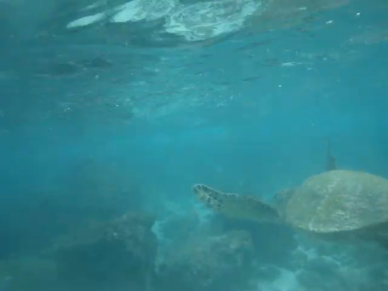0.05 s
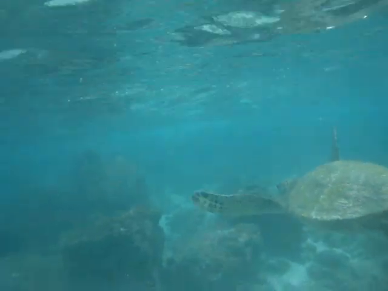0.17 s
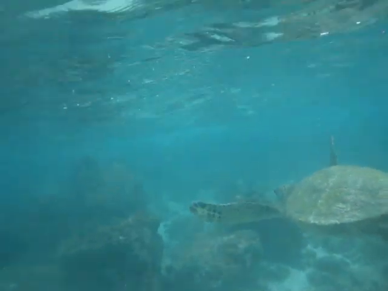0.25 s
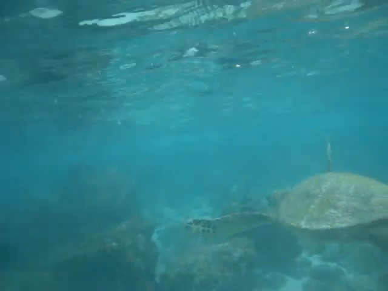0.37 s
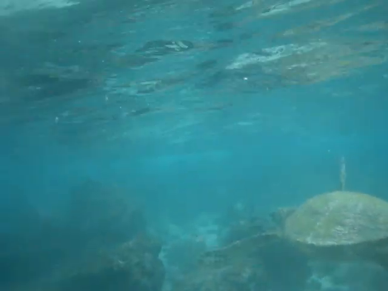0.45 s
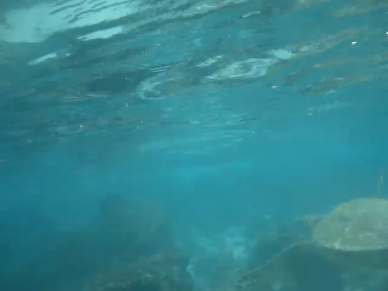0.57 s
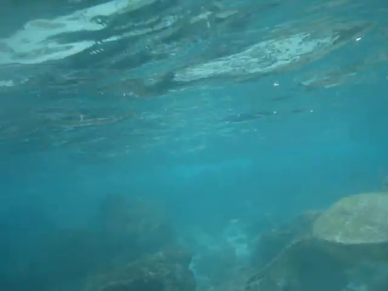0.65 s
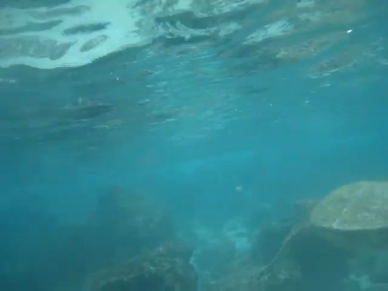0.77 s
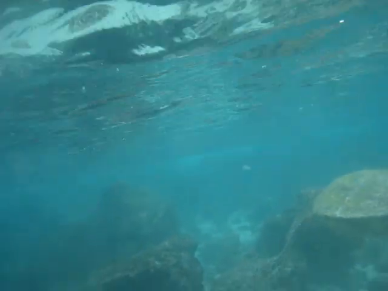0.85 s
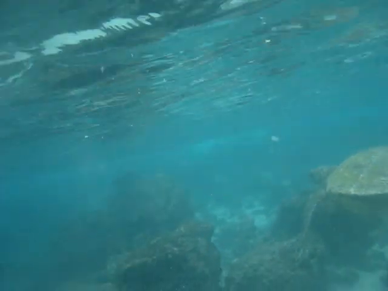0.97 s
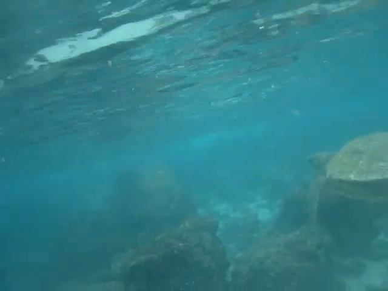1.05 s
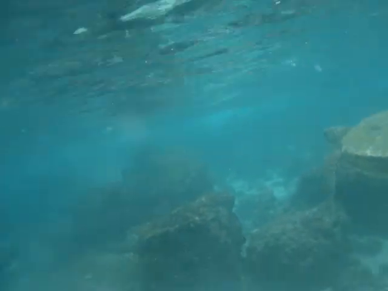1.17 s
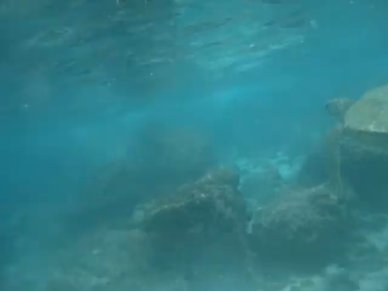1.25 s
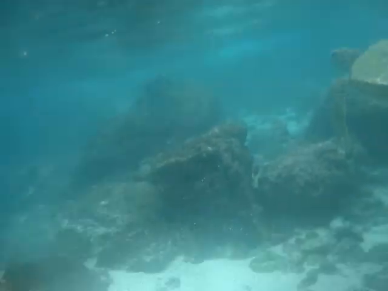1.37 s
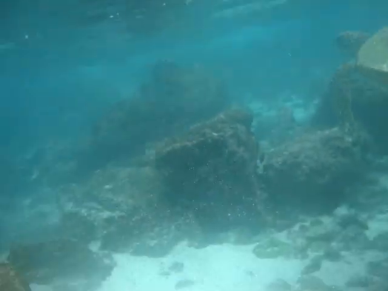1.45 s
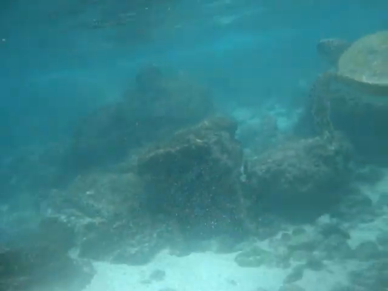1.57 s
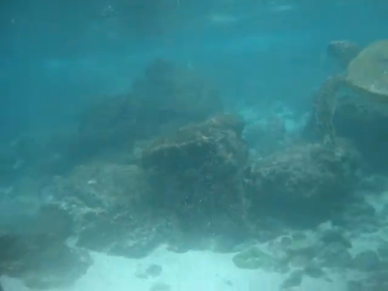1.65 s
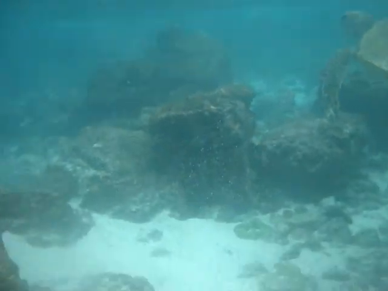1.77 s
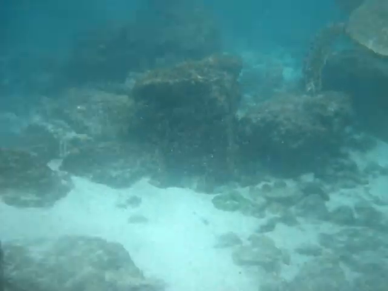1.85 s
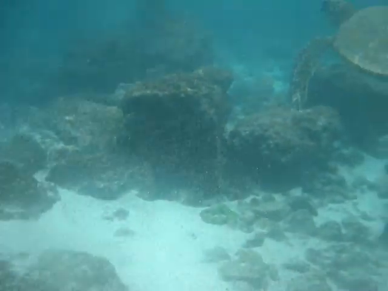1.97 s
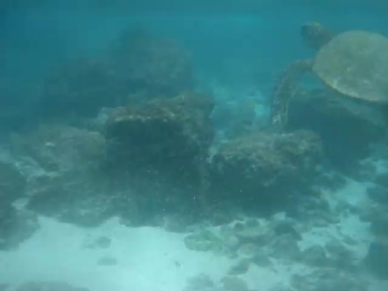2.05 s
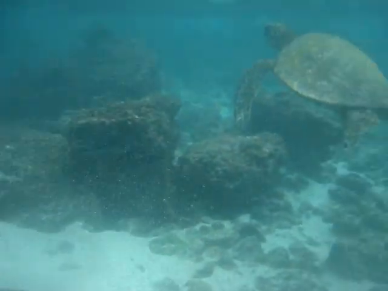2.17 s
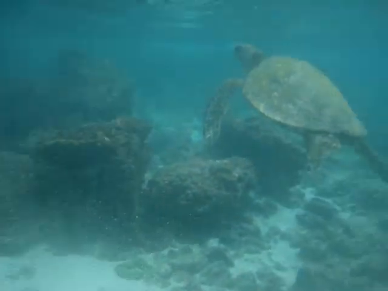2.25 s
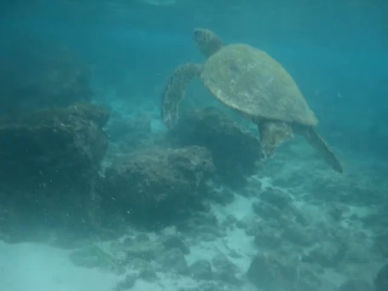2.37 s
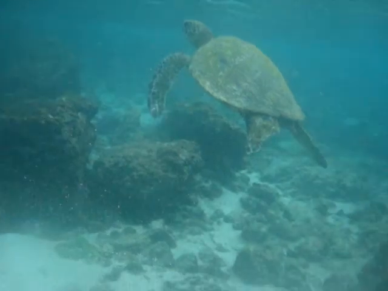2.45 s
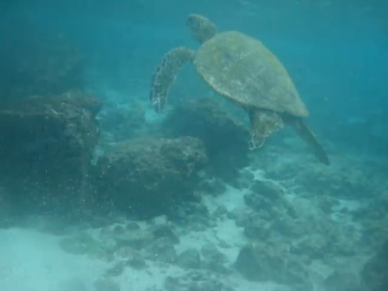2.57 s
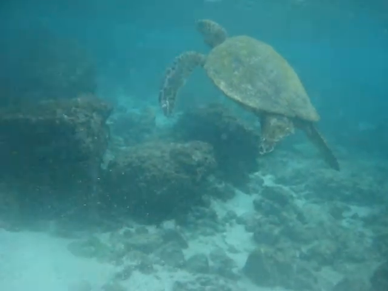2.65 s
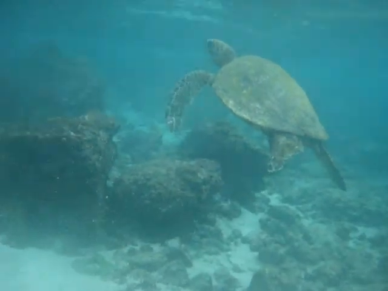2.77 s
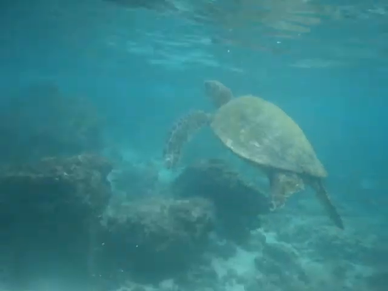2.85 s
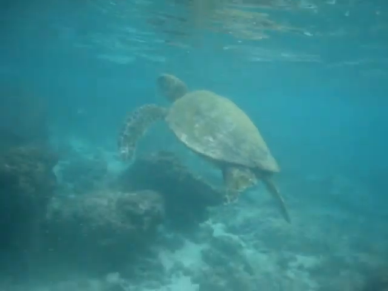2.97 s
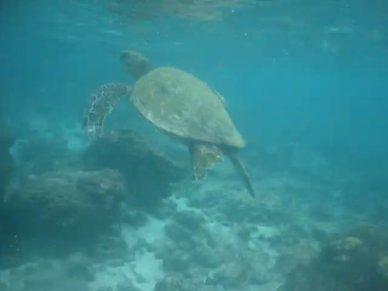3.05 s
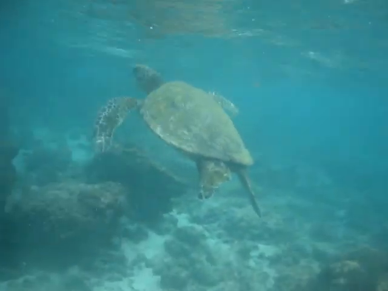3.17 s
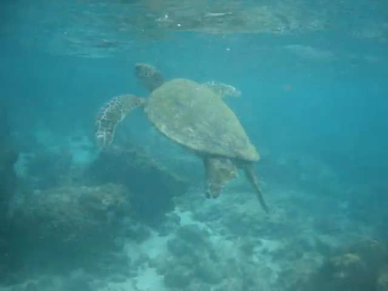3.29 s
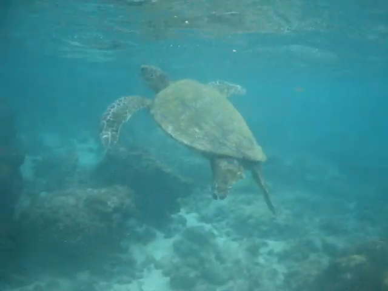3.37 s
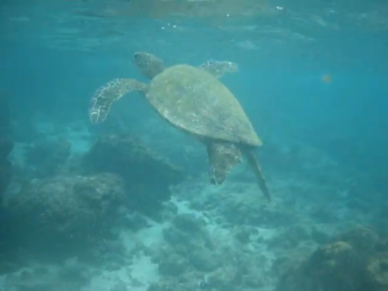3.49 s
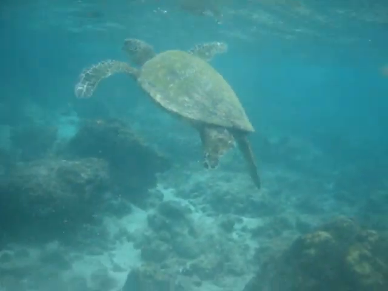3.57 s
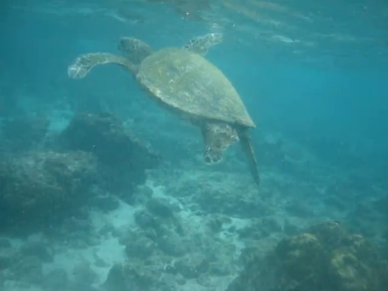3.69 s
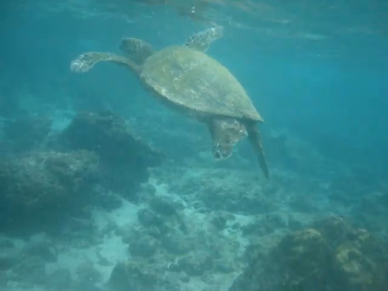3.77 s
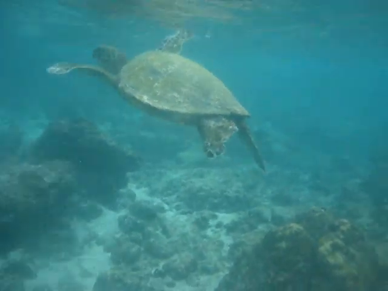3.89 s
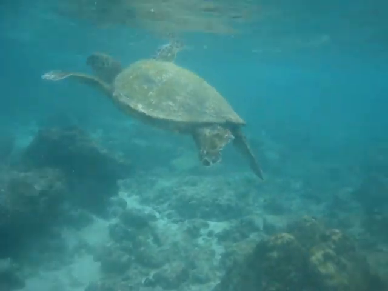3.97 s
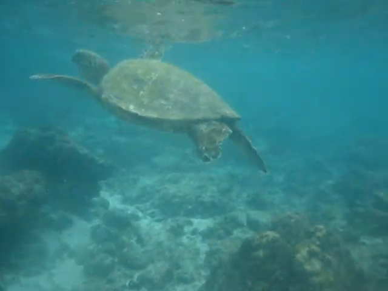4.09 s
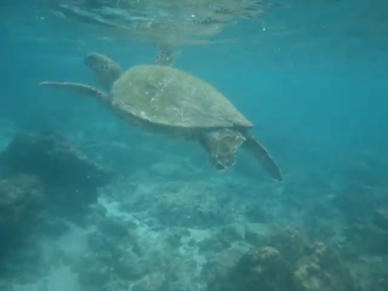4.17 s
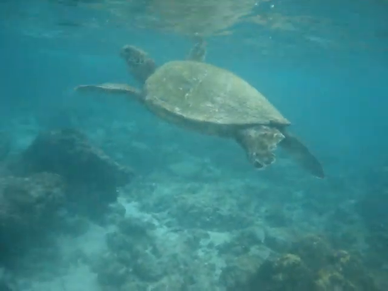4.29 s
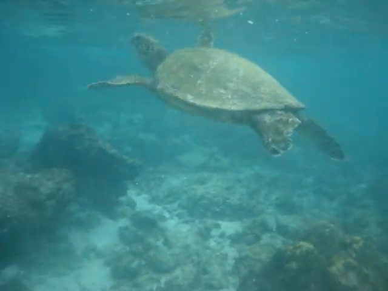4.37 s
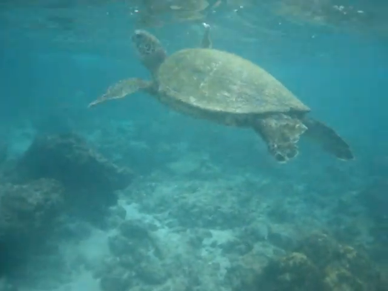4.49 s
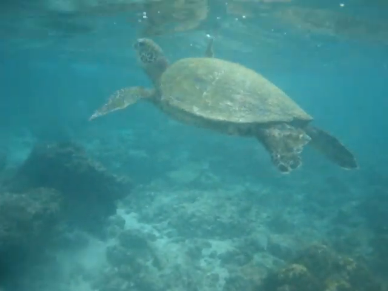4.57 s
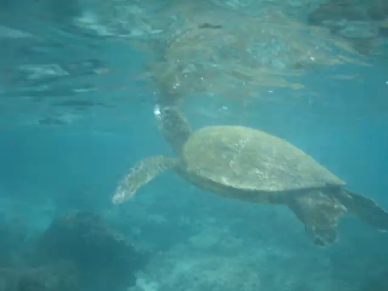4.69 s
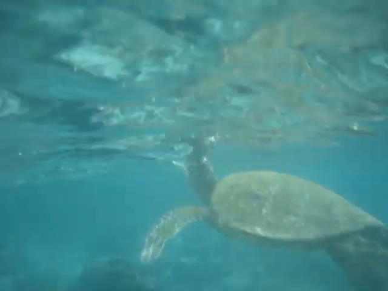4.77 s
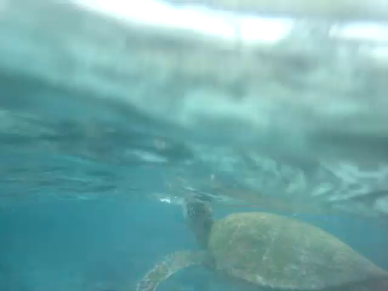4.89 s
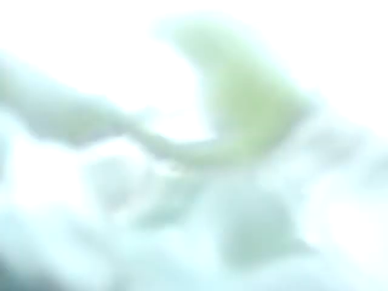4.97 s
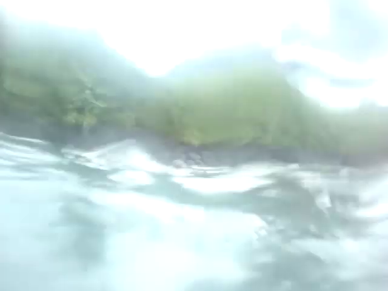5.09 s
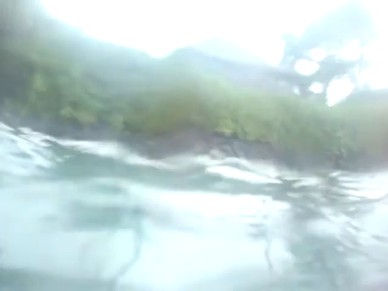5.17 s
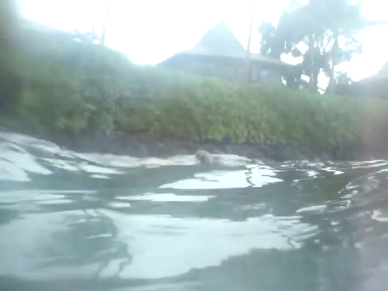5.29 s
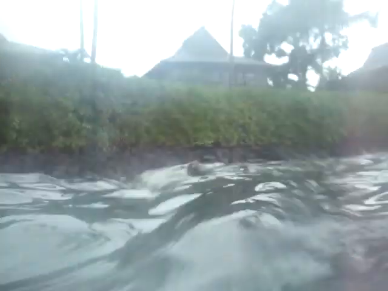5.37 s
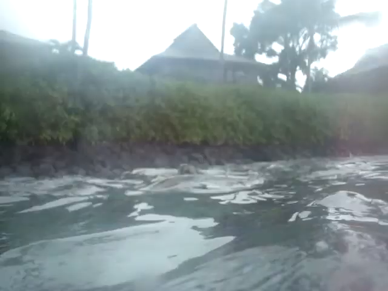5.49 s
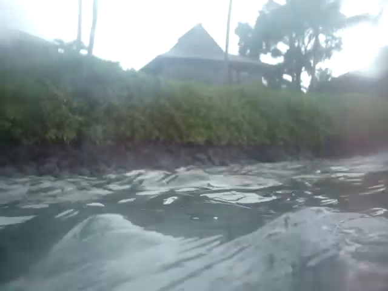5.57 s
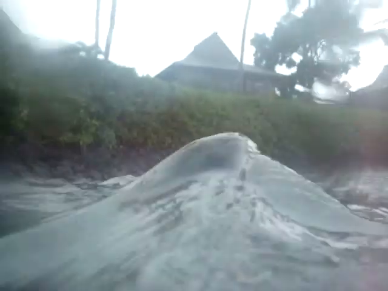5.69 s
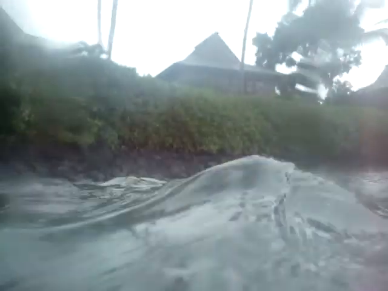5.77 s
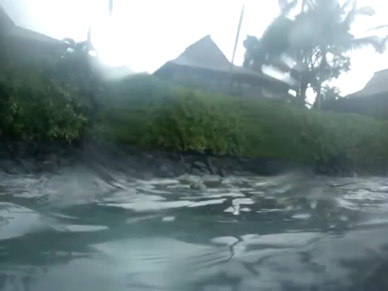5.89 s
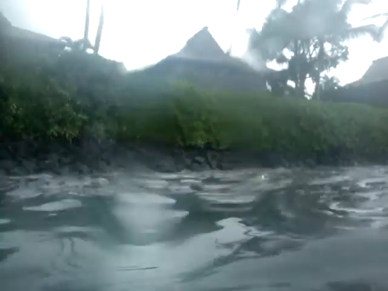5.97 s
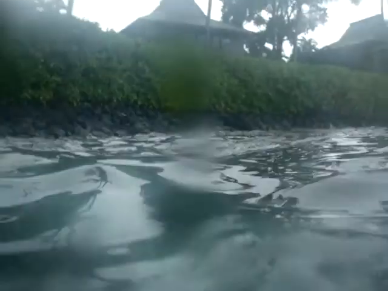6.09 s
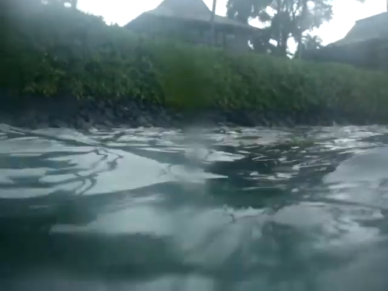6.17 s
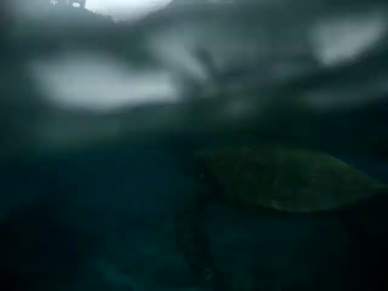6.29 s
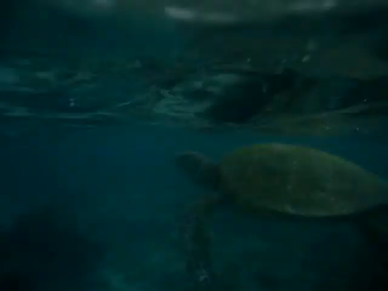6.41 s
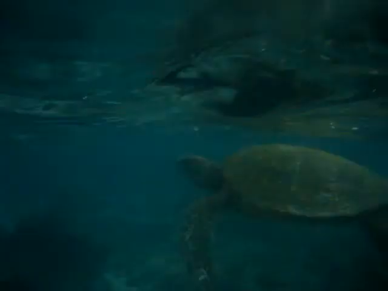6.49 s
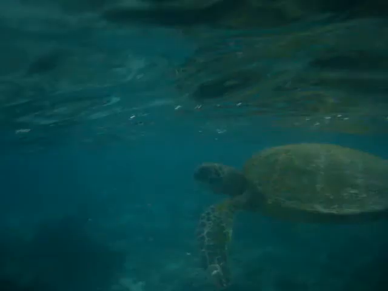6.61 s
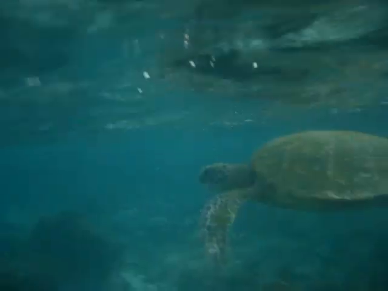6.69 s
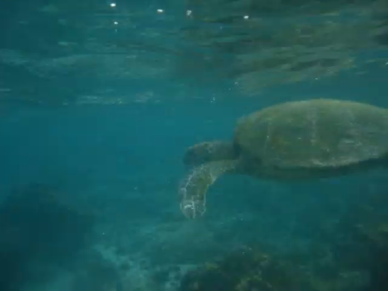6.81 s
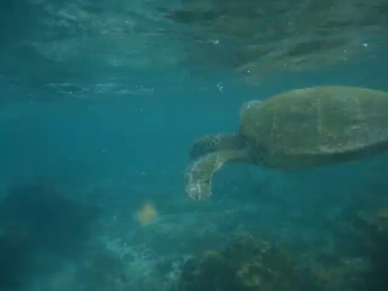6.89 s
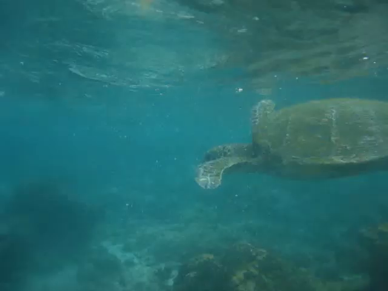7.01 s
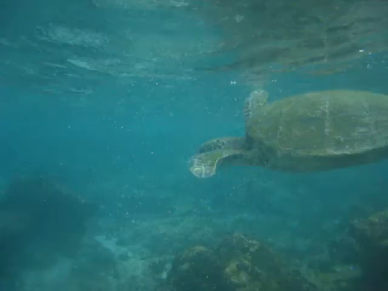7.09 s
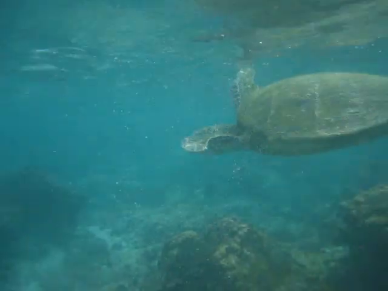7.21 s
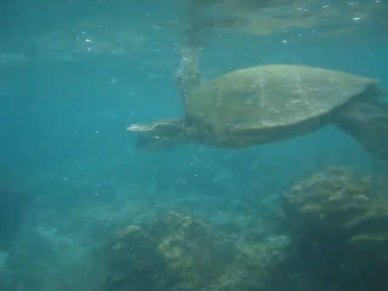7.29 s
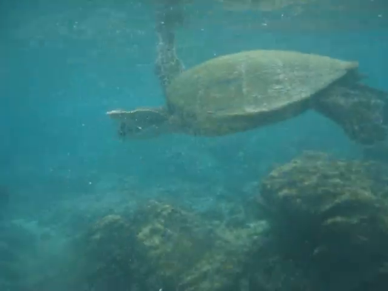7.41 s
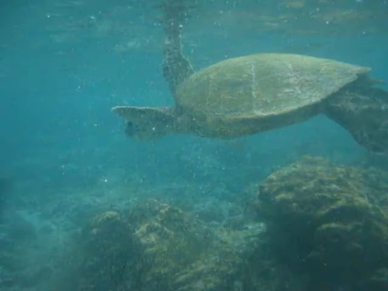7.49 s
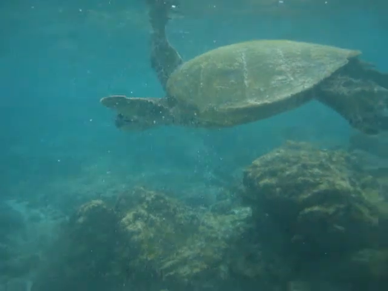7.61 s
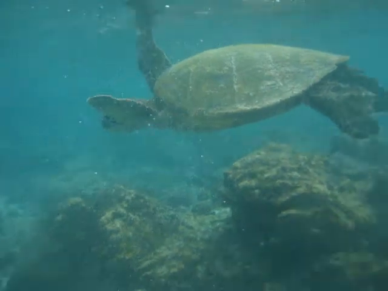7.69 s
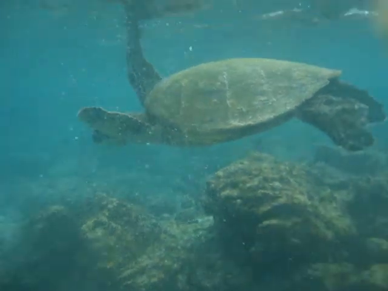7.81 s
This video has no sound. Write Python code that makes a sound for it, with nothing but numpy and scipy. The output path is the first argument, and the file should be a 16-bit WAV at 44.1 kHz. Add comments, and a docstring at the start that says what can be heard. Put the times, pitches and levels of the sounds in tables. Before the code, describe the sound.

A small camera in a sealed housing drifts in shallow sea beside a silently swimming turtle. Faint hiss and dull water rush continue throughout. A hard hollow tick comes near two seconds, followed by smaller clicks. Around five seconds it surfaces with crackling droplets, bubble plips and trickling; after a quiet gap, a much louder slap marks going under, with gurgles dying away. Very close, dry contact sound.

```python
"""A faint steady hiss and a dull rush of water run throughout: shaped noise, with fine grain and brief swishes.
A small camera in a sealed housing drifts in shallow sea; the housing ticks now and then, ringing its modes.
It comes up through the surface and dips under again: water slaps and trickles over the housing.
Splats are puffs of noise, bubbles are damped sines, the trickle is many tiny grains of both kinds,
and low thumps are short one-sided pushes of pressure."""
import sys
import numpy as np
from scipy import signal
from scipy.fft import rfft, irfft, next_fast_len
from scipy.io import wavfile
from scipy.ndimage import uniform_filter1d

SR = 44100
rng = np.random.default_rng(int(sys.argv[2]) if len(sys.argv) > 2 else 0)


def master_out(mix):
    """Clip the mix to full scale and print it as 16-bit PCM to the path in sys.argv[1]."""
    frames = np.transpose(np.atleast_2d(mix))
    ceiling = np.clip(frames, -1, 1)
    pcm = np.round(ceiling * 32767).astype(np.int16)
    wavfile.write(sys.argv[1], SR, pcm)


N = 346185

# colour of the steady hiss: pitch_hz, relative level_db
HISS_COLOUR = [(15, -51), (25, -36), (42, -25.5), (116, -7.5), (202, 0), (568, 1.5), (645, 0), (965, -10),
               (1520, -11), (1860, -13.5), (2000, -7.5), (7810, -16), (9550, -17.5), (10300, -28),
               (13400, -44), (22000, -120)]
# colour of the water stirring past the housing: pitch_hz, relative level_db
RUSH_COLOUR = [(150, -8), (400, 5.5), (1000, 6.5), (1800, 2.5), (3500, -25), (7000, -18)]
# brief swishes of water along the housing: top_s, level_db, half_length_s
WATER_SWISHES = [(1.334, -48, .035), (2.1, -60, 0.043), (2.323, -57.5, 0.026), (2.562, -55, 0.025),
                 (4.44, -66, .15)]
# ticks of the housing: start_s, level_db (ringing), sharpness_db_per_octave above the lowest mode,
# crack_level_db, crack_pitch_hz
HOUSING_TICKS = [(1.952, -5, 2, -29, 4100), (1.998, -25, 0.5, -30.5, 4740), (2.107, -25, -2, -39, 1750),
                 (2.456, -42, 14, -38, 8000), (2.573, -38, -7, -41, 1800), (2.633, -24, 8, -27, 6300),
                 (3.14, -26.5, -6, -34, 3780), (4.004, -41, 0, -33.5, 3100), (4.368, -42, -2, -50, 1500),
                 (4.482, -43, -3, -53, 1500), (5.703, -31, -3, -48, 2500), (5.94, -22.5, 3, -35, 5200),
                 (7.124, -14.5, -2.5, -21.5, 1900), (7.407, -32, -4, -28.5, 2720)]
# the tones at which the housing rings: pitch_hz, level_db, t60_s (time to fall by 60 dB)
HOUSING_MODES = [(443, -1.5, 0.015), (552, -2.5, 0.02), (1181, 8.5, 0.012), (1500, 0.5, 0.02),
                 (1737, 4, 0.013), (2253, 4.5, 0.0094), (2706, -5, 0.014), (3240, -7, 0.0087),
                 (4840, -14, 0.0078), (5620, -40, 0.0017)]
# pressure jolts on the microphone: start_s, level_db, length_s
PRESSURE_THUMPS = [(5.422, -27.5, 0.0016), (6.32, -43, 0.008), (6.35, -49, 0.0094), (6.792, -19, 0.00056),
                   (7.123, -54, 0.0022)]
# fine trickle at the two surface crossings, coming up and going under; each a list of: time_s, level_db
TRICKLE_LEVELS = [
    [(5.04, -72), (5.08, -57), (5.18, -37.5), (5.25, -55.5), (5.33, -43.5), (5.4, -55), (5.49, -72)],
    [(6.33, -33), (6.39, -52.5), (6.45, -46), (6.53, -44.5), (6.58, -53), (6.66, -52.5), (6.78, -57),
     (6.9, -54)],
]
# strength of the tiny trickle bubbles by pitch: pitch_hz, level_db
TRICKLE_BUBBLE_COLOUR = [(350, 1.5), (700, 8), (1500, 14), (2500, 4.5), (3600, -7), (5000, -28),
                         (9000, -40)]
# ringing air pockets: start_s, level_db, pitch_hz, t60_s, rise_octaves (reached at 0.7 of t60)
AIR_BUBBLES = [(2.099, -35, 550, .016, 0.032), (2.318, -44, 1770, 0.025, .17),
               (5.057, -19, 1250, 0.017, .08), (5.057, -31.5, 1690, 0.033, 0.086),
               (5.074, -37, 2020, .012, 0.043), (5.0878, -38, 1900, .033, 0.053),
               (5.097, -31, 2740, .015, 0.02), (5.1027, -27.5, 2550, 0.022, 0.29),
               (5.1208, -18, 863, 0.019, 0.079), (5.159, -29.5, 2250, .052, 0.35),
               (5.161, -22, 3100, 0.0098, 0.32), (5.166, -36, 451, 0.077, 0.96),
               (5.1675, -26.5, 1274, .026, 0.24), (5.19, -17.5, 2310, 0.019, 0.09),
               (5.233, -32, 1600, .018, 0.15), (5.259, -39, 2980, .013, .25),
               (5.2427, -29, 1460, 0.056, 0.053), (5.245, -18, 3410, 0.015, .01),
               (5.3, -37, 1490, .037, 0.13), (5.3902, -35, 784, 0.067, 0.15),
               (5.3974, -16, 1182, 0.021, 0.26), (5.423, -8.5, 1500, 0.017, 0.045),
               (5.428, -21, 1590, 0.024, .24), (5.4567, -34, 1610, 0.017, 0.41),
               (5.5909, -22, 3770, .016, 0.33), (5.5952, -28, 972, 0.027, 0),
               (6.322, -3.5, 953, .01, 0.078), (6.3369, -7, 2860, 0.015, 0), (6.349, -26, 1730, .014, 0.19),
               (6.353, -42, 896, .19, 0.063), (6.4183, -17, 1940, .026, 0.0048),
               (6.4252, -25, 1360, 0.016, 0.64), (6.4274, -26.5, 2400, 0.013, 0.11),
               (6.46, -37, 3470, .039, 0.047), (6.479, -32.5, 554, .021, 0.094),
               (6.5086, -34, 413, 0.027, 0.12), (6.5196, -16.5, 786, 0.024, 0),
               (6.5361, -18.5, 1380, 0.016, .02), (6.54, -26, 1115, .015, .32),
               (6.5451, -23.5, 1470, 0.025, 0.14), (6.5576, -17.5, 3400, .0093, 0.23),
               (6.578, -31.5, 890, .023, .07), (6.613, -34, 1850, 0.022, 0.094),
               (6.6409, -31.5, 3500, .028, 0.074), (6.6426, -19, 1256, 0.013, 0.051),
               (6.6464, -32.5, 297, 0.067, 0.085), (6.6642, -23.5, 1880, .015, 0.11),
               (6.668, -24.5, 2310, 0.012, 0.066), (6.7172, -30.5, 1290, 0.03, 0.081),
               (6.718, -30.5, 557, 0.009, 0.2), (6.7997, -17.5, 1780, 0.015, 0.21),
               (6.8535, -44, 2200, .03, 0.021), (6.9426, -29.5, 1500, 0.014, 0.23),
               (6.9485, -23.5, 983, 0.048, 0.16), (7.727, -43, 1090, .05, 0.062)]
# droplets and slaps on the housing: start_s, level_db (puff alone), pitch_hz (centre), spread_octaves
WATER_SPLATS = [(5.083, -24, 1770, 0.39), (5.094, -32, 2670, 0.26), (5.1146, -29, 2630, .23),
                (5.123, -22.5, 2200, 0.14), (5.16, -32.5, 4000, 0.48), (5.177, -41, 3300, .3),
                (5.1945, -22, 4670, 0.46), (5.201, -32, 5800, 0.31), (5.212, -45, 4360, .19),
                (5.2403, -21.5, 2280, 0.52), (5.2431, -29, 5400, .16), (5.271, -38, 6540, 0.48),
                (5.2745, -29, 2300, 0.36), (5.284, -28, 1960, 0.28), (5.295, -27.5, 5170, .29),
                (5.327, -20.5, 8870, .48), (5.332, -25.5, 6540, 0.11), (5.3345, -23, 2110, 0.45),
                (5.3572, -27, 3400, 0.29), (5.374, -30, 2530, 0.66), (5.394, -27, 7100, .17),
                (5.4224, -16.5, 3700, 0.65), (5.4242, -15, 1540, 0.3), (5.4514, -17, 1430, 0.19),
                (5.447, -47, 9400, .15), (5.452, -29, 3030, .19), (5.456, -23, 4500, 0.63),
                (5.46, -27, 6000, 0.97), (5.5893, -17, 3730, 0.2), (5.59, -31, 7100, 0.13),
                (5.622, -34.5, 3560, .2), (6.3219, -7, 2530, 0.69), (6.326, -28, 7500, .3),
                (6.328, -5, 1670, 0.82), (6.334, -2.5, 2000, 0.68), (6.343, -14, 2470, .35),
                (6.357, -19.5, 7600, 0.34), (6.356, -23.5, 2900, 0.54), (6.366, -45, 3000, .4),
                (6.385, -44, 3500, 0.25), (6.396, -16, 3970, 0.25), (6.398, -25, 1490, 0.6),
                (6.4292, -15, 1340, 0.62), (6.447, -24, 4630, 0.19), (6.466, -34, 3200, 0.37),
                (6.486, -36, 5030, .9), (6.509, -31, 5000, .88), (6.5176, -21, 3930, 0.25),
                (6.54, -14.5, 3210, 0.17), (6.5496, -27, 6570, 0.29), (6.5569, -20, 1420, 0.94),
                (6.592, -31, 4930, 0.52), (6.6174, -24.5, 2300, 0.58), (6.637, -32, 4000, 0.68),
                (6.651, -28, 2500, .48), (6.6624, -27, 8500, 0.15), (6.676, -32, 8000, .49),
                (6.705, -29.5, 2300, 0.41), (6.742, -28, 3500, 0.64), (6.7798, -36, 7430, .31),
                (6.7804, -23.5, 3160, 0.58), (6.7901, -10.5, 6100, 0.26), (6.801, -15.5, 1050, 0.77),
                (6.805, -14.5, 1600, 0.65), (6.872, -31, 1500, 0.67), (6.877, -28.5, 1500, 0.71),
                (6.9548, -33, 3200, .14)]

HISS_DB, STIR_DB = -54, -57  # levels of the hiss and of the dull rush
SWISH_LOW_HZ, SWISH_HIGH_HZ = 796, 2200
CONTACT_S = 0.00306  # time within which the small knocks of one tick fall
CRACK_S, CRACK_OCTAVES = 0.006, 0.29  # length and pitch spread
SPLAT_S = 0.0071
SPATTER_PER_S, SPATTER_DB, SPATTER_T60_S = 430, -12, 0.033  # small drops thrown off by each splat
PORT_HZ = 161  # the sealed port passes little bass
OVERLOAD = 0.72  # amplitude at which the input stops growing
EDGE_HZ = 10150  # top of the recorder's band


def gain_of(db):
    """Turn decibels into a plain multiplier."""
    return 10 ** (np.asarray(db) / 20)


def evened(x):
    """Scale a sound to an average (rms) level of 1."""
    return x / np.sqrt(np.mean(x ** 2) + 1e-20)


def add(mix, start_s, sound):
    """Add a sound into the mix at its start time, cutting it off at the end of the mix."""
    part = mix[round(start_s * SR):][:len(sound)]
    part += sound[:len(part)]


def coloured(points):
    """Make steady noise of rms 1 by shaping the strength of each pitch."""
    size = next_fast_len(N)
    hz, db = np.transpose(points)
    log_pitch = np.log(np.fft.rfftfreq(size, 1 / SR) + 1)
    shape = gain_of(np.interp(log_pitch, np.log(hz + 1), db))
    noise = irfft(rfft(rng.standard_normal(size)) * shape, size)
    return evened(noise[:N])


def level(rows):
    """Join (time, dB) rows into a gain over time, nearly silent outside them."""
    time_s, db = np.transpose(rows)
    return gain_of(np.interp(np.arange(N) / SR, time_s, db, -120, -120))


def ring(hz, t60, rise=0., onset=0.0002, size=4096):
    """A damped sine with a soft start; a bubble nearing the surface climbs, holds its level, then bursts."""
    t = np.arange(size) / SR
    pitch = hz * 2 ** (rise * np.minimum(t / (0.7 * t60), 1.2) ** 3)
    # a larger rise keeps the level up longer before it drops
    decay = gain_of(-60 * (t / t60) ** (1 + 5 * abs(rise)))
    shape = (1 - np.exp(-t / onset)) * decay
    return shape / shape.max() * np.sin(2 * np.pi * np.cumsum(pitch) / SR)


def burst(noise, centre_hz, spread, length, skirt_db=-20):
    """A puff of noise of peak 1 around a centre pitch, with a broad skirt from the sudden contact."""
    t = np.arange(len(noise)) / SR
    octaves = np.log2((np.fft.rfftfreq(len(noise), 1 / SR) + 1) / centre_hz)
    skirt = gain_of(skirt_db - 11.7 * abs(octaves))
    colour = np.exp(-0.5 * (octaves / spread) ** 2) + skirt
    attack = 1 - np.exp(-(t / (0.12 * length)) ** 2)
    decay = np.exp(-(t / length) ** 2 * 3.08)
    sound = attack * decay * irfft(rfft(noise) * colour)
    return sound / abs(sound).max()


def grains(per_s, spread_db, shapes):
    """Random onsets of random size, a few large, each playing one of the shapes; rms 1."""
    sizes = gain_of(spread_db * np.minimum(rng.exponential(1, N), 4))
    onsets = sizes * (rng.random(N) < per_s / SR)
    kind = rng.integers(0, len(shapes), N)
    return evened(sum(signal.oaconvolve(onsets * (kind == k), shape)[:N]
                      for k, shape in enumerate(shapes)))


def hiss():
    """Faint steady noise with a fixed colour."""
    return gain_of(HISS_DB) * coloured(HISS_COLOUR)


def water(grain_db=-4, swish_grain_db=-6.0, fall_db=-4.0):
    """Stirring water is a dull rush with soft fine grain; brief swishes are brighter and a little less grainy."""
    # the grains weaken by fall_db for each octave above 800 Hz
    blips = [gain_of(fall_db * np.log2(f / 800)) * ring(f, 0.016, onset=0.0011, size=1024)
             for f in np.geomspace(800, 4500, num=16)]
    rush = coloured(RUSH_COLOUR)
    grain = grains(per_s=1500, spread_db=3, shapes=blips)
    stir = gain_of(STIR_DB) * (rush + gain_of(grain_db) * grain)

    t = np.arange(N) / SR
    swell = sum(gain_of(db) * np.exp(-((t - top_s) / half_s) ** 2)
                for top_s, db, half_s in WATER_SWISHES)
    band = signal.butter(2, [SWISH_LOW_HZ, SWISH_HIGH_HZ], "band", fs=SR, output="sos")
    swish = evened(signal.sosfilt(band, rng.standard_normal(N)))
    return stir + swell * (swish + gain_of(swish_grain_db) * grain)


def ticks():
    """Micro-impacts ring the housing, sharper ones its high modes; each tick has a crack of its own level and pitch."""
    out = np.zeros(N)
    lowest_hz = HOUSING_MODES[0][0]
    for start_s, db, sharpness_db, crack_db, crack_hz in HOUSING_TICKS:
        modes = sum(gain_of(mode_db + sharpness_db * np.log2(f / lowest_hz))
                    * ring(f, t60, onset=0.0017, size=2048)
                    for f, mode_db, t60 in HOUSING_MODES)
        sound = modes.copy()
        # three weaker knocks, one at random in each third of the contact
        places = (np.arange(3) + rng.random(3)) / 3
        for place, strength in zip(places, (-0.45, 0.35, -0.25)):
            add(sound, place * CONTACT_S, strength * modes)
        add(out, start_s, gain_of(db) * sound / abs(sound).max())
        crack = burst(rng.standard_normal(512), crack_hz, CRACK_OCTAVES, CRACK_S)
        add(out, start_s, gain_of(crack_db) * crack)
    return out


def thumps():
    """One-sided pushes of pressure, each a smooth hump."""
    out = np.zeros(N)
    for start_s, db, length_s in PRESSURE_THUMPS:
        add(out, start_s, gain_of(db) * np.hanning(round(length_s * SR)))
    return out


def trickle(spray_db=-7):
    """Many tiny overlapping bubbles, and sparser droplets of spray that tick higher up."""
    hz, db = np.transpose(TRICKLE_BUBBLE_COLOUR)
    # lower bubbles ring longer
    blips = [gain_of(np.interp(np.log(f), np.log(hz), db))
             * ring(f, 0.0035 + 14 / f, 0.22, onset=0.00055, size=1536)
             for f in np.geomspace(350, 9000, num=30)]
    drops = [burst(rng.standard_normal(512), f, 0.15, 0.004)
             for f in np.geomspace(1800, 5500, num=10)]
    fizz = grains(per_s=1500, spread_db=3, shapes=blips)
    spray = grains(per_s=400, spread_db=3, shapes=drops)
    flow = sum(level(rows) for rows in TRICKLE_LEVELS)
    return flow * (fizz + gain_of(spray_db) * spray)


def bubbles():
    """Each air pocket rings once; longer ringers swell more slowly, and moving water makes the level flutter."""
    out = np.zeros(N)
    flutter = rng.standard_normal((len(AIR_BUBBLES), 4096))
    for _ in range(2):  # smooth twice for a slow wobble
        flutter = uniform_filter1d(flutter, size=160)
    wobbles = gain_of(1.5 * evened(flutter))
    for (start_s, db, hz, t60, rise), wobble in zip(AIR_BUBBLES, wobbles):
        onset = 0.19 * min(t60, 0.07) ** 2 + 0.0001
        add(out, start_s, gain_of(db) * wobble * ring(hz, t60, rise, onset=onset))
    return out


def splats():
    """Each droplet or slap is one puff of noise, trailed by a dying spatter of smaller drops."""
    out = np.zeros(N)
    t = np.arange(2048) / SR
    fade = gain_of(SPATTER_DB - 60 * t / SPATTER_T60_S)
    for start_s, db, hz, spread in WATER_SPLATS:
        noise = rng.standard_normal(len(t))
        puff = burst(noise, hz, spread, SPLAT_S)
        hits = rng.random(len(t)) < SPATTER_PER_S / SR
        drops = hits * noise[::-1] * fade  # reversed noise gives the drops random strengths
        spatter = signal.fftconvolve(drops, puff)[:len(t)]  # each drop repeats the puff
        add(out, start_s, gain_of(db) * (puff + spatter))
    return out


def scene():
    """Sounds on the housing lose bass through the port; the hiss, stirring water and thumps do not."""
    contact = ticks() + trickle() + bubbles() + splats()
    port = signal.butter(3, PORT_HZ, "high", fs=SR, output="sos")
    contact = signal.sosfilt(port, contact)
    return (hiss() + water() + thumps() + contact)[None]


def record(dry):
    """The input rounds off the loudest slaps; then the band limit of the recorder removes the top treble."""
    rounded = dry / (1 + abs(dry / OVERLOAD) ** 6) ** (1 / 6)
    low_pass = signal.firwin(401, EDGE_HZ, window=("kaiser", 6), fs=SR)
    return signal.oaconvolve(rounded, low_pass[None], "same")


dry = scene()
out = record(dry)
master_out(out)
```